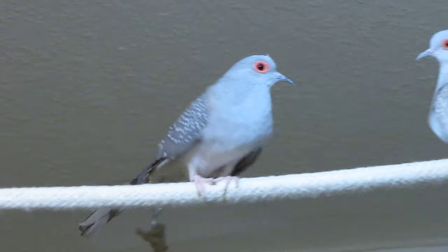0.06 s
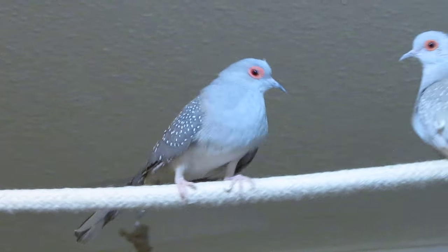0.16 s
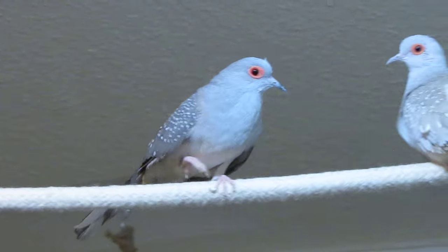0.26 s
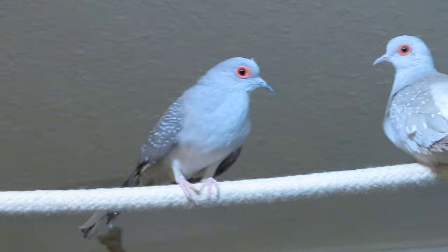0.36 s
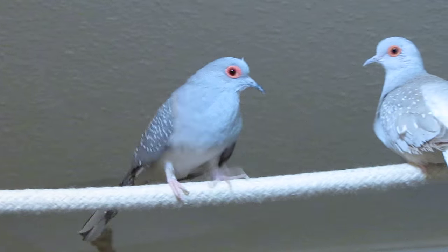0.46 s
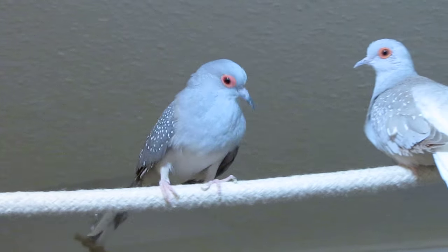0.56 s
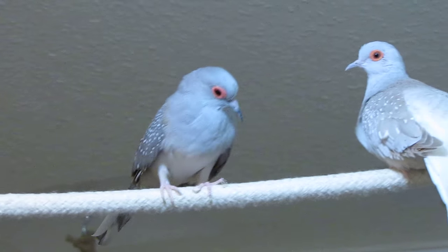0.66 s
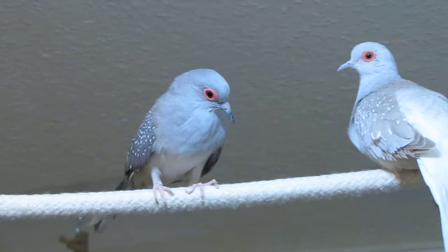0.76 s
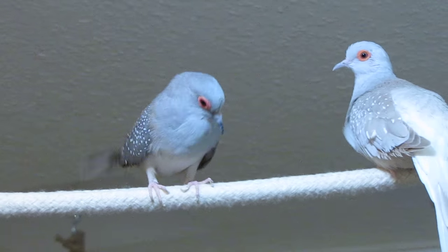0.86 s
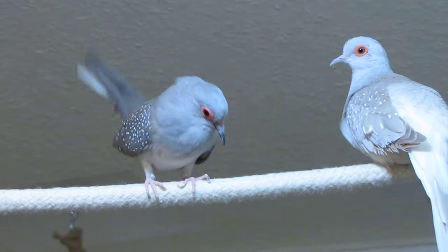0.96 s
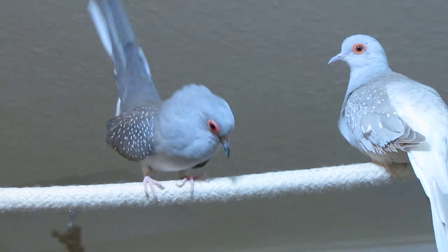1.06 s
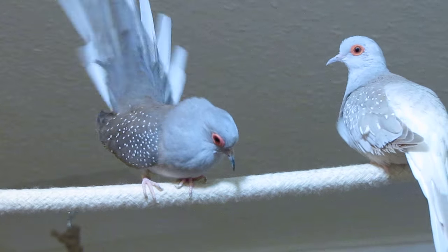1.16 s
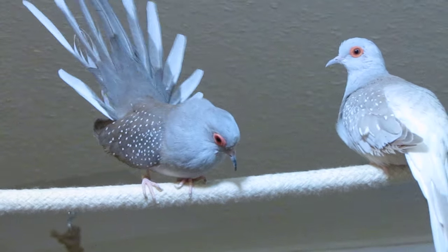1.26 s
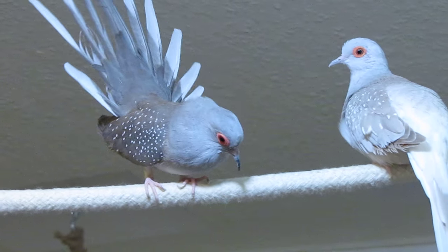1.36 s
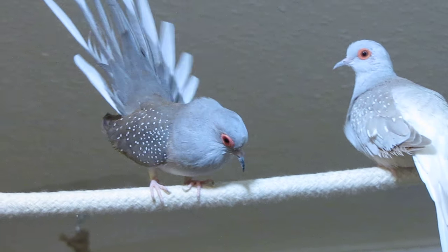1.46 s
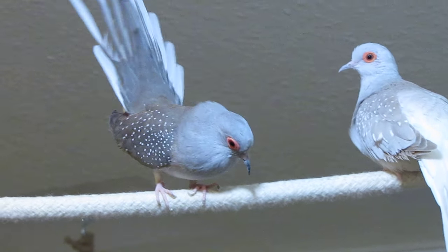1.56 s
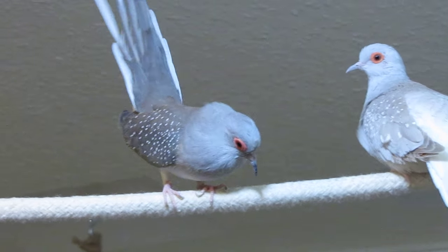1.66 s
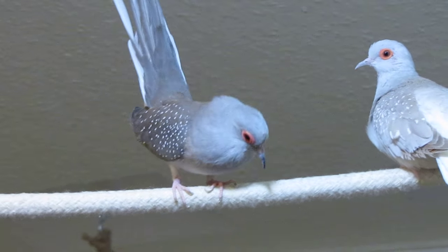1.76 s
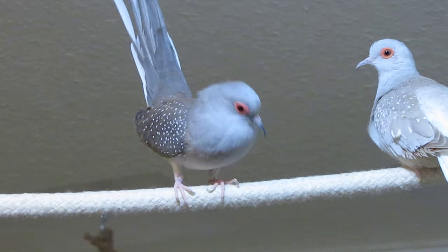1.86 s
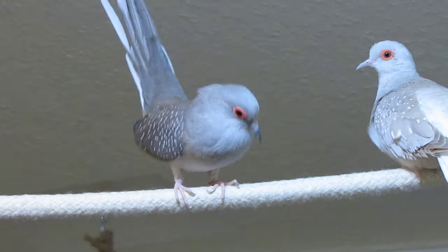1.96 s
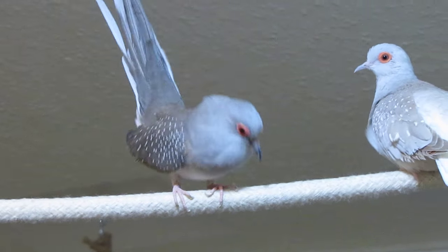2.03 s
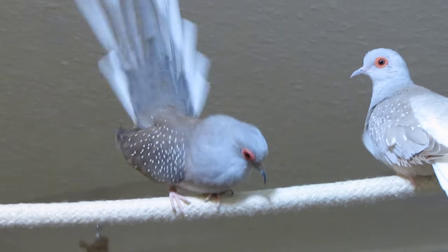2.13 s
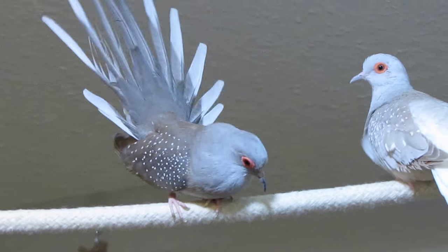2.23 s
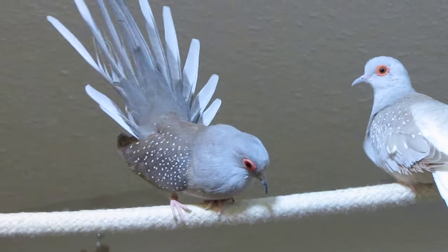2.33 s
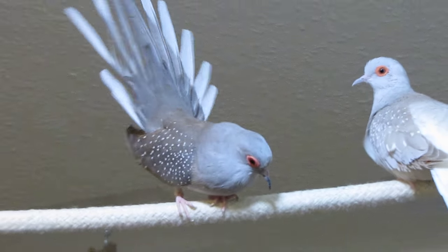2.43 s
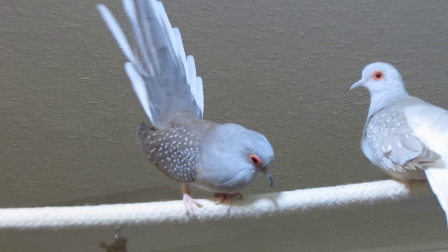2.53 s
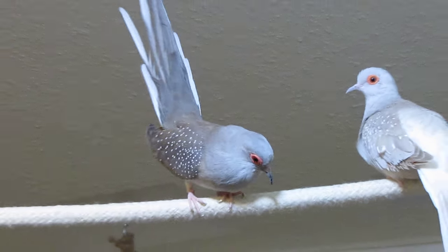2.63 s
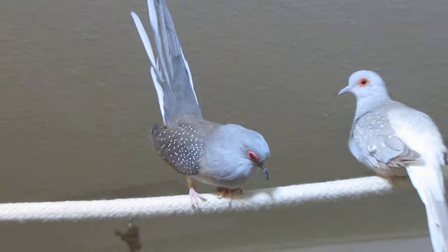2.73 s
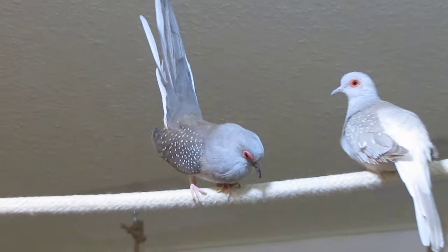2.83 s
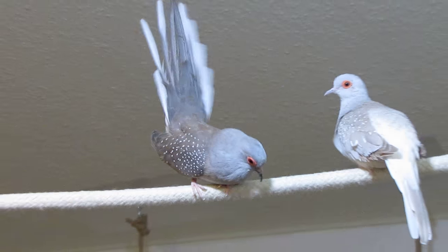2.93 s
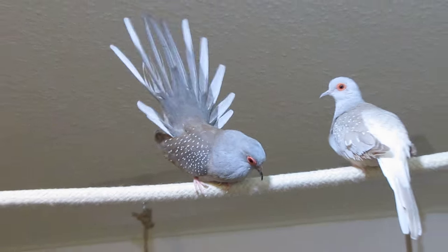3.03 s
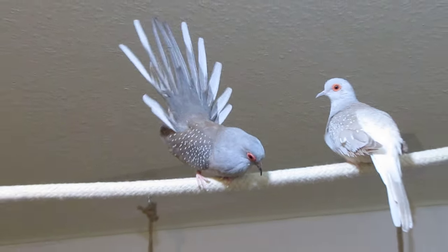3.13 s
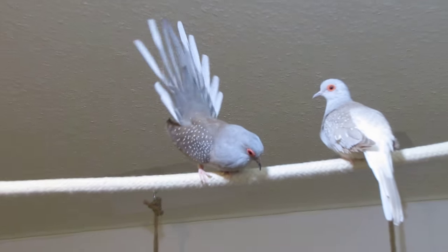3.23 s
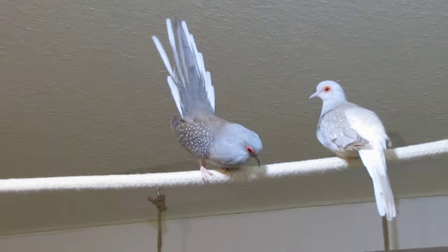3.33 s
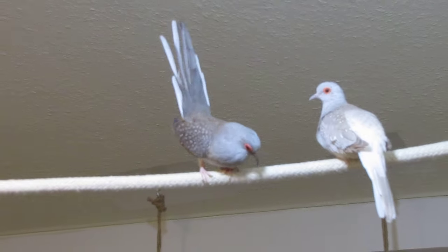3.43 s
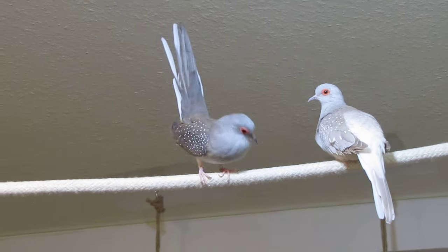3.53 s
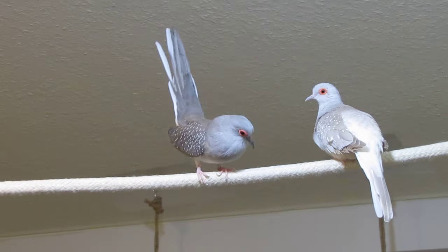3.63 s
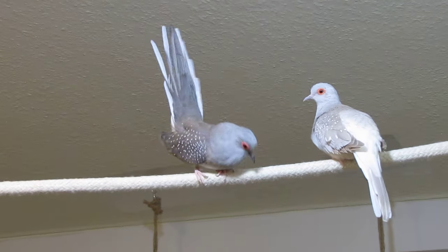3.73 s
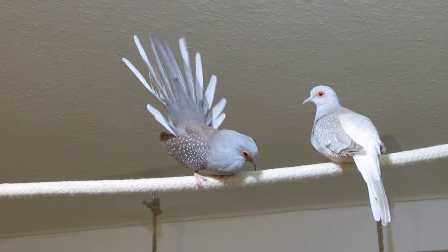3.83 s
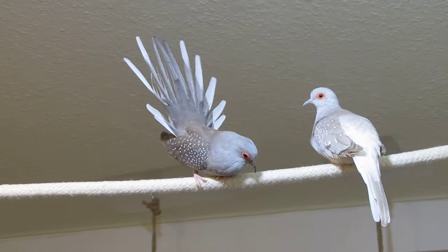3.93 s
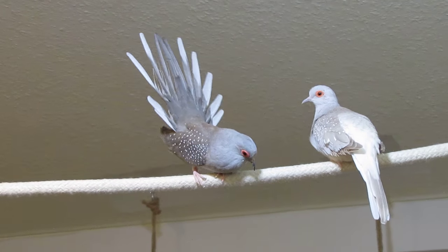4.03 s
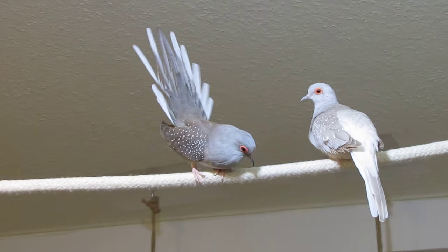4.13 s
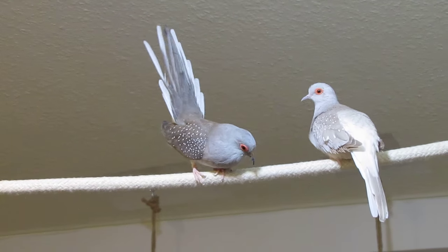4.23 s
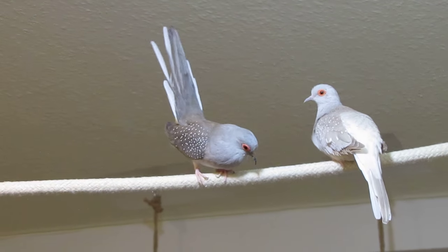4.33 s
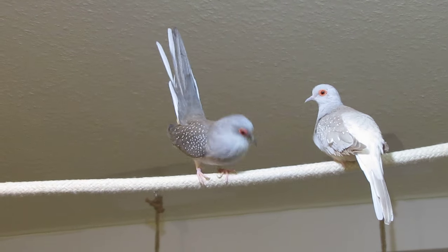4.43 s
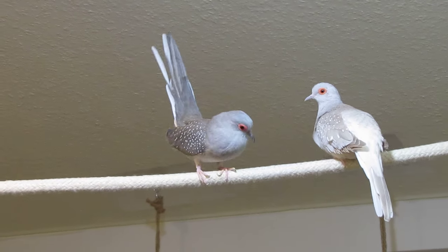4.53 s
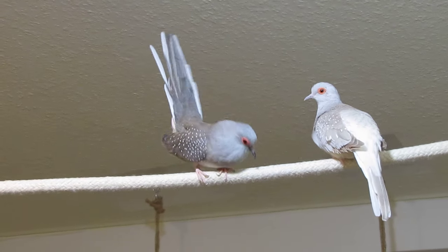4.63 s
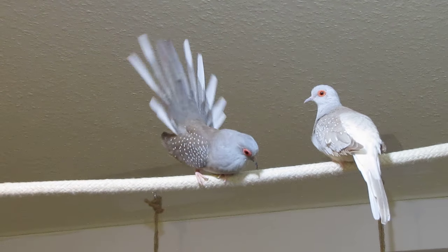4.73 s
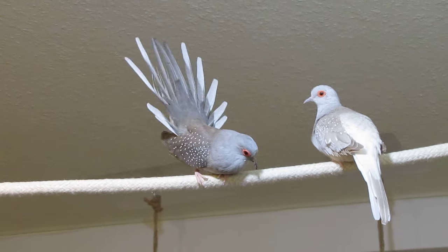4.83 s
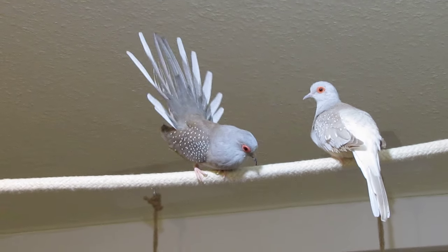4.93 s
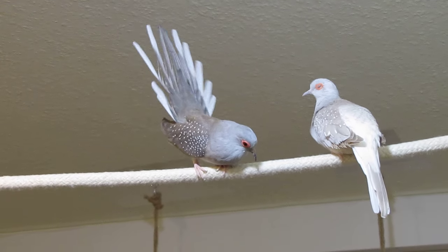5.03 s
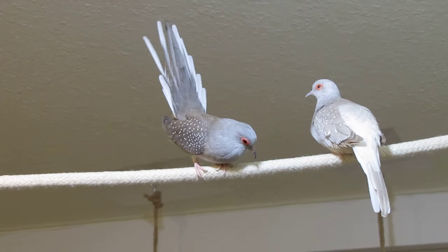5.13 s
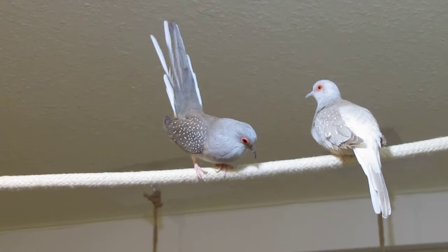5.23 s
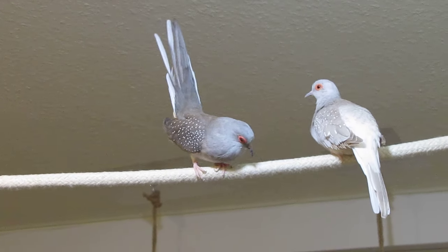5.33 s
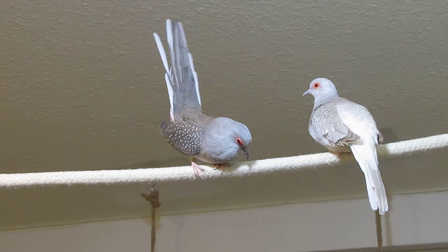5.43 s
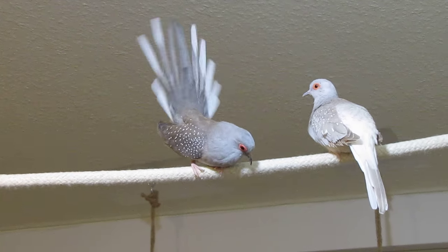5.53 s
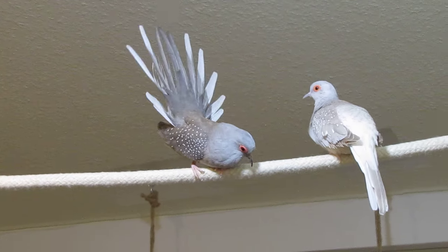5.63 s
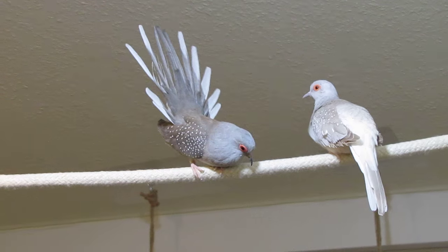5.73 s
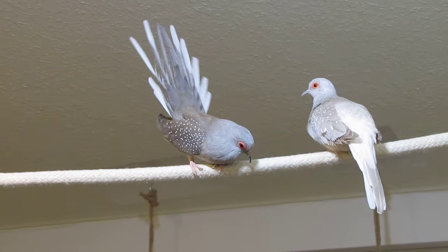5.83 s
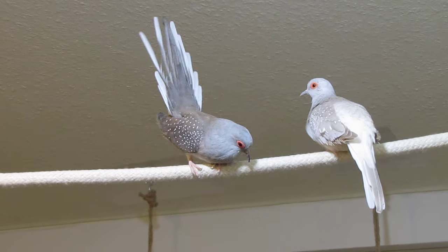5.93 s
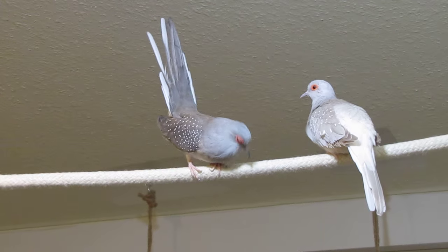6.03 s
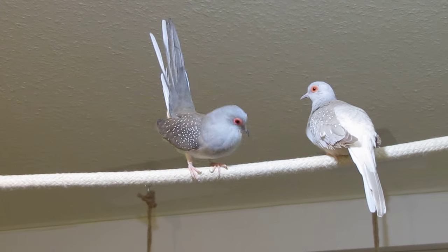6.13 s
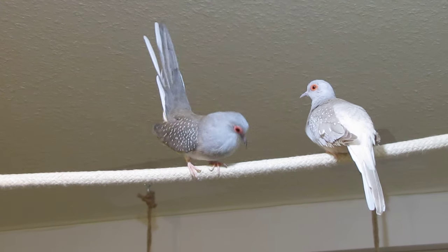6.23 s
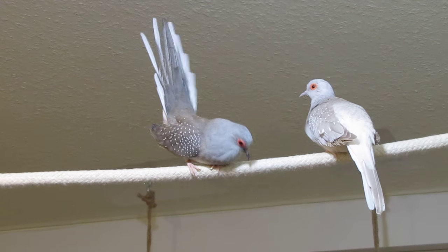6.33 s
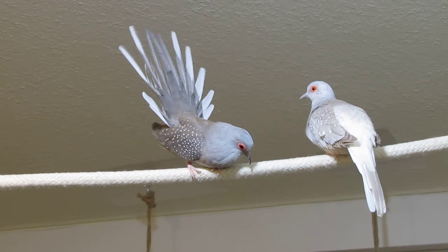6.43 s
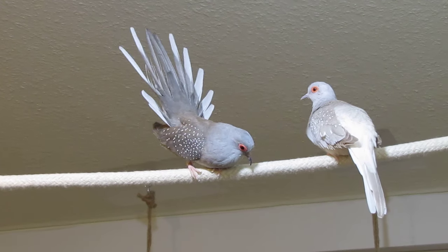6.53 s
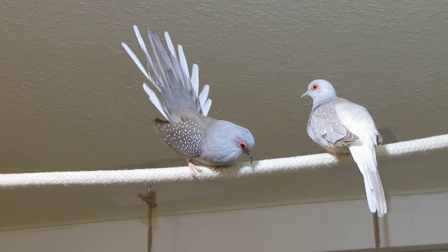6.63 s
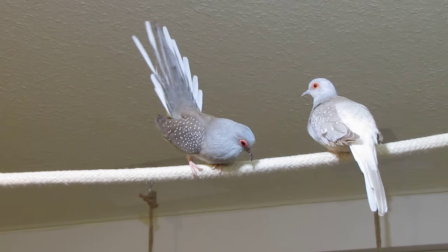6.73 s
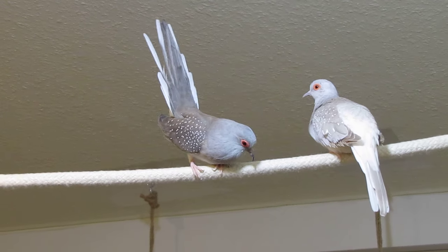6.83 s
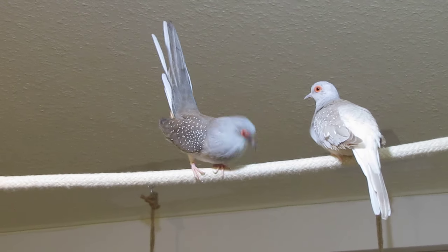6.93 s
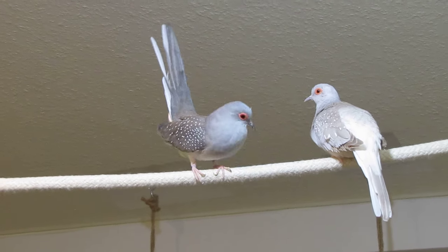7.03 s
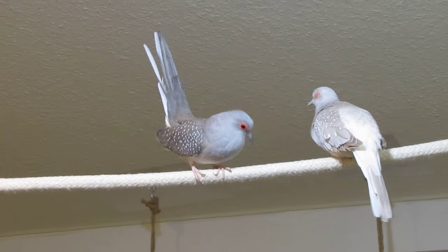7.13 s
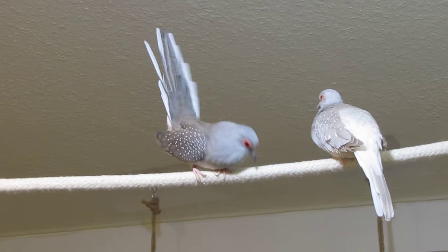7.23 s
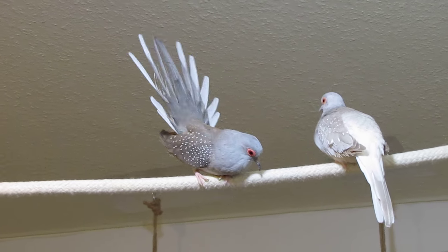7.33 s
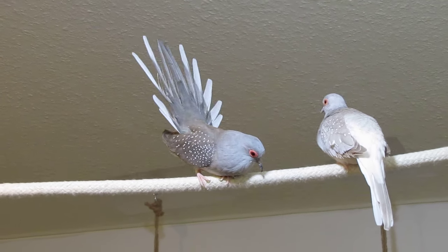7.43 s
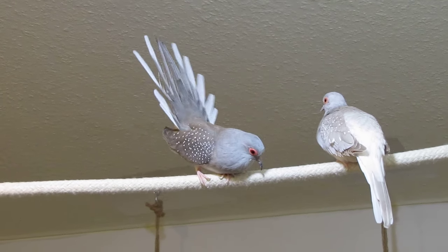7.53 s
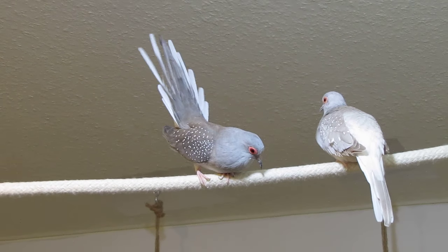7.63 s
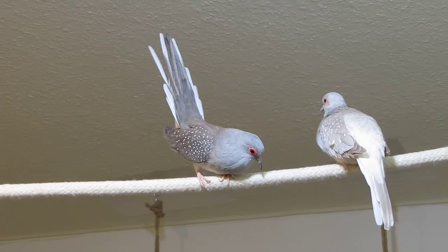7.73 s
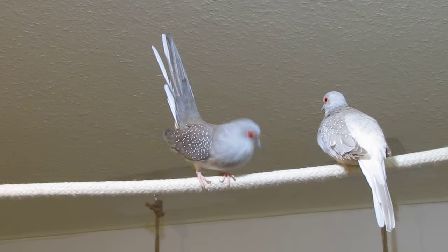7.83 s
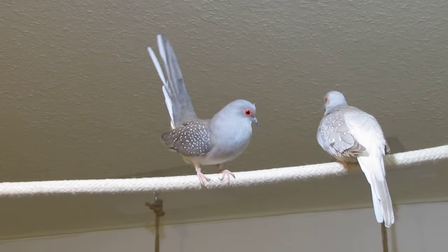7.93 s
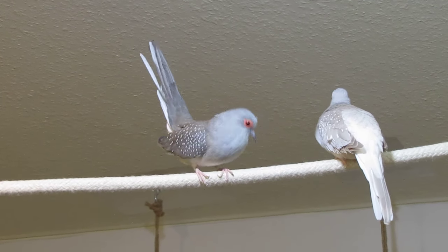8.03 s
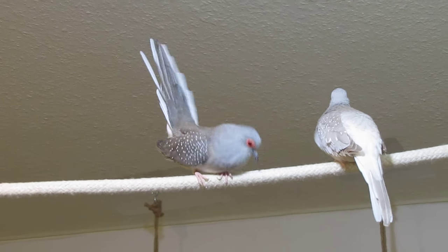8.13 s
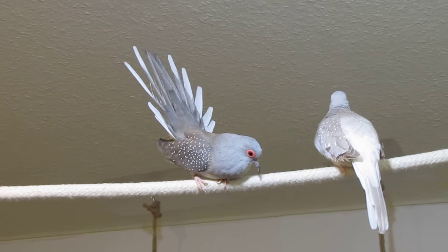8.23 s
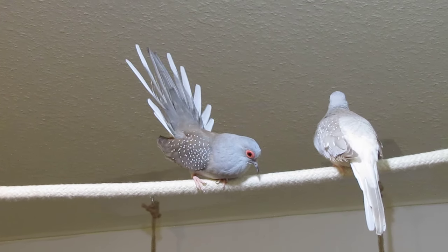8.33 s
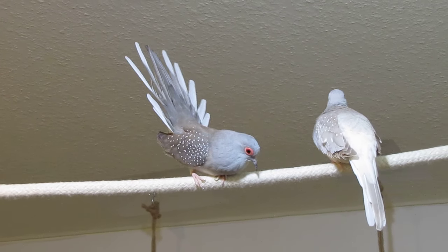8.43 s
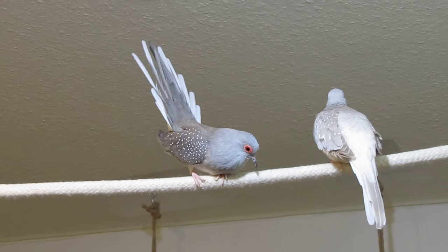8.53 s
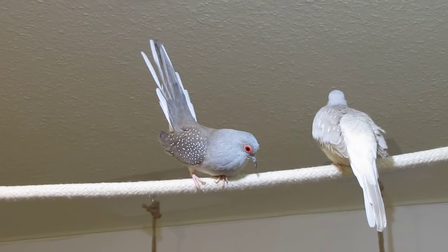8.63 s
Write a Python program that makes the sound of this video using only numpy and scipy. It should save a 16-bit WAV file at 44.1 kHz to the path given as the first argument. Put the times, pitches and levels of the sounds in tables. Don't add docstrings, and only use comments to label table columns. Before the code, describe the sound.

A courting dove on a rope perch coos nine times at regular intervals, its smooth low whistle-like tone slightly purring at the start and ringing off bare walls. Brief hissy rubs of fanning tail feathers fall between coos, with a few clicks close to the stereo microphone. Traffic murmurs faintly. In the second half another bird, a parakeet across the room, adds gliding whistles and sharp quick chirps, mostly as echoes.

```python
import sys
import numpy as np
from scipy import signal
from scipy.fft import rfft, irfft
from scipy.io import wavfile
from scipy.ndimage import uniform_filter1d

SR = 44100
rng = np.random.default_rng(int(sys.argv[2]) if len(sys.argv) > 2 else 0)


def generate_wav(sig):
    pcm = np.round(np.clip(np.atleast_2d(sig).T, -1, 1) * 32767).astype(np.int16)
    wavfile.write(sys.argv[1], SR, pcm)


def undo_db(level):
    steps = np.asarray(level, float) / 20
    return 10 ** steps


N = 382788
EDGE_HZ = 15700


def evened(x):
    return x / np.sqrt(np.mean(x ** 2) + 1e-20)


def read(points, hz):
    f, value = np.transpose(points)
    return np.interp(np.log(hz + 1), np.log(f + 1), value)


def add(mix, start_s, sound):
    part = mix[round(start_s * SR):][:len(sound)]
    part += sound[:len(part)]


def drift(length, hz):
    noise = rng.standard_normal(length + 4000)
    return evened(signal.lfilter(*signal.butter(2, hz, fs=SR), noise)[4000:])


def band_noise(shape, low_hz, high_hz, order=2):
    return signal.lfilter(*signal.butter(order, [low_hz, high_hz], "band", fs=SR), rng.standard_normal(shape))


def pair(shape, same):
    a, b, c, d = rng.standard_normal(shape[::-1] + (4,)).T
    same = np.clip(same, -1, 1)[:, None]
    left, other = a + 1j * b, c + 1j * d
    return np.array([left, same * left + np.sqrt(1 - same ** 2) * other])


def air():
    # f/Hz, level/dB per Hz
    air_spectrum = [(25, -12.5), (55, -1), (90, -18), (140, -11.5), (320, -17.5), (600, -19), (1000, -11.5),
                    (2000, -27), (4500, -28.5), (15600, -36)]
    # f/Hz, likeness [-1..1]
    air_same = [(60, 0.95), (180, 0.39), (550, 0.36), (1650, 0.034), (4970, 0.11), (15000, 0.075)]
    # f/Hz, level/dB
    air_lean = [(60, 1), (180, -2), (550, -2), (1650, 0), (4970, 1.5), (15000, -2)]
    frames, hz = N // 256 + 5, np.fft.rfftfreq(1024, 1 / SR)
    patches = rng.standard_normal((frames, 513)).T
    patches_db = evened(uniform_filter1d(uniform_filter1d(patches, 10, 0), 20, 1))
    z = pair((513, frames), read(air_same, hz)) * undo_db(read(air_spectrum, hz)[:, None] + patches_db)
    z = z * undo_db(np.multiply.outer([.5, -.5], read(air_lean, hz)))[:, :, None]
    return undo_db(-50.5) * evened(signal.istft(z, nperseg=1024, noverlap=768)[1][:, :N])


def engine():
    # t/s, f/Hz, level/dB
    engine_course = [(0.0, 70.36, -62), (0.22, 73.04, -59), (0.5, 58.5, -76), (0.74, 45.56, -60),
                     (1.01, 65.55, -47.5), (1.33, 71.9, -51.5), (1.57, 61.17, -52), (2.03, 60.5, -49.5),
                     (2.39, 74.76, -47), (2.9, 77.53, -64.5), (3.2, 78.96, -53.5), (3.58, 58.8, -53),
                     (3.8, 55.35, -56), (4.33, 56.4, -47), (4.6, 60, -63.5), (7.5, 59.7, -58),
                     (8.25, 66.75, -43), (8.68, 66.7, -48.5)]
    t = np.arange(N) / SR
    s, hz, db = np.transpose(engine_course)
    turn = 2 * np.pi * np.cumsum(np.interp(t, s, hz) + 3.0 * drift(N, 2.1)) / SR
    level = undo_db(np.interp(t, s, db) + 1.8 * drift(N, 3.8))
    port_phase = np.array([[0], [.3]])
    return np.sqrt(2) * level * (np.sin(turn + port_phase) + undo_db(-19.5) * np.sin(2 * turn))


def tyre_band(level_db, low_hz, high_hz, unlike):
    noise = band_noise((3, N), low_hz, high_hz)
    return undo_db(level_db) * evened(noise[0] + unlike * noise[1:])


def tyres():
    t = np.arange(N) / SR
    gust_db = 10 * np.exp(-((t - 4.23) / 0.12) ** 2)
    wash_db = -49 - 2.5 * abs(t - 2.4) + gust_db
    roar_db = -57 - 2.5 * abs(t - 0.89)
    wash = undo_db(-4.5) * tyre_band(wash_db, 46, 350, 0.79)
    roar = tyre_band(roar_db, 720, 1420, .8) * undo_db(np.array([[-1.5], [1.5]]))
    return wash + roar


def feathers():
    # middle t/s, length/s, level/dB, dullness/dB per octave
    swishes = [(0.399, 0.11, -66, -5), (1.204, 0.19, -57.5, 0.5), (1.588, 0.083, -52.5, 1.4),
               (2.171, 0.19, -54, 2.5), (2.989, 0.11, -58.5, -2), (3.823, 0.11, -51.5, 4.5),
               (4.218, .27, -51.5, -2), (4.628, 0.058, -50, 0), (4.739, 0.15, -56, -0.5),
               (2.806, 1.0, -65, -2.5), (5.122, 0.097, -37.5, -8), (5.403, 0.39, -49, -10),
               (6.398, 0.11, -57.5, 1), (7.302, 0.092, -58.5, -3.5), (8.206, .12, -58, -0.4)]
    # f/Hz, level/dB per Hz
    vane_spectrum = [(710, -33.5), (1200, -1), (1250, -27.5), (1420, -9), (2460, -7), (3180, -8),
                     (15500, -7)]
    out, hz = np.zeros(N), np.fft.rfftfreq(SR, 1 / SR)
    bass_cut = (hz ** 2 / (hz ** 2 + 1000 ** 2)) ** 2
    for middle_s, length_s, db, dull_db in swishes:
        n = round(length_s * SR)
        grains = rng.standard_normal(SR) * undo_db(2.5 * drift(SR, 250))
        colour = undo_db(read(vane_spectrum, hz) + dull_db * np.log2(hz / 3000 + 0.022)) * bass_cut
        rub = irfft(rfft(grains) * colour)[:n]
        add(out, middle_s - length_s / 2, undo_db(db) * evened(rub) * signal.windows.tukey(n, .7))
    return out


def ticks():
    # t/s, peak level/dB, ring f/Hz, thud level/dB, bright share [0..1]
    tick_events = [
        (0.37, -46.5, 2400, -38, .02),
        (1.552, -38.5, 1710, -31, 0.075),
        (1.936, -48, 1500, -27.5, 0.099),
        (2.297, -27.5, 3625, -28, 0.11),
        (2.326, -38.5, 3590, -40, 0.056),
        (2.375, -29.5, 3706, -27, 0.09),
        (3.166, -39, 2500, -42.5, 0.032),
        (3.326, -28, 3436, -30, 0.048),
        (3.479, -18, 1407, -38, 0.072),
        (7.638, -52, 8230, -64, 0.095),
    ]
    out, t = np.zeros(N), np.arange(2000) / SR
    for s, db, hz, thud_db, bright in tick_events:
        decay = undo_db(-60 * t * hz / 45)
        grit = rng.standard_normal(len(t)) * decay * np.minimum(t / 0.0072, 1)
        ring = signal.lfilter(*signal.butter(1, [hz * .65, hz * 1.5], "band", fs=SR), grit)
        crack = ring + bright * np.diff(grit, prepend=0)
        thud = band_noise(len(t), 200, 1300) * undo_db(-60 * t / 0.075)
        add(out, s, undo_db(db) * crack / abs(crack).max() + undo_db(thud_db) * thud / abs(thud).max())
    return out


def voice(rows, waver, waver_hz, smooth_s, steady_hz):
    s, hz, db = np.transpose(rows)
    t = np.arange(s[0], s[-1], 1 / SR)
    smooth = max(round(smooth_s * SR), 1)
    hz = uniform_filter1d(np.interp(t, s, hz), smooth, mode="nearest")
    db = uniform_filter1d(np.interp(t, s, db), smooth, mode="nearest")
    slack = np.clip(10 * (1 - hz / steady_hz), 0, 1)
    wavering = 1 + waver * (1 + 2 * slack) * drift(SR, waver_hz)[:len(t)]
    turn = 2 * np.pi * np.cumsum(hz * wavering) / SR
    return turn, hz, np.sqrt(2) * undo_db(db) * signal.windows.tukey(len(t), .05), slack


def parakeet(calls, beak, waver, steady_hz, rasp, strain):
    out = np.zeros(N)
    for rows in calls:
        turn, hz, level, _ = voice(rows, waver, 280, 0.0017, steady_hz)
        strain_db = strain * (rows[-2][2] + 32.5)
        tone = 0
        for k in range(1, 9):
            partial_db = read(beak, k * hz) - read(beak, hz) + (k > 1) * strain_db
            tone = tone + undo_db(partial_db) * (k * hz < EDGE_HZ) * np.sin(k * turn)
        onset = 1 + 1.7 * np.exp(-np.arange(len(hz)) / SR / 0.012)
        rough = rasp * onset * drift(SR, 670)[:len(hz)]
        add(out, rows[0][0], level * tone * (1 + rough))
    return signal.lfilter(*signal.butter(4, 0.9 * steady_hz, "high", fs=SR), out)


def warble_shape(start_s, length_s, from_hz, to_hz, db):
    end_s, edge_db = start_s + length_s, db - 20.5
    return [(start_s, from_hz, edge_db), (start_s + .011, from_hz, db),
            (end_s, to_hz, db - 3), (end_s + 0.0043, to_hz, edge_db)]


def warbles():
    # t/s, length/s, from f/Hz, to f/Hz, effort level/dB
    glides = [(1.138, 0.12, 1288, 1430, -51), (3.69, 0.16, 1167, 1116, -68), (4.564, 0.16, 981, 981, -44.5),
              (5.095, .09, 1060, 1194, -47), (5.563, 0.051, 976, 1008, -37),
              (4.403, 0.049, 1651, 1625, -35), (4.449, 0.035, 1473, 1305, -39.5),
              (4.524, .035, 1321, 2330, -40), (4.549, 0.034, 1391, 1346, -46.5),
              (4.578, 0.014, 2016, 1920, -43.5), (4.609, 0.017, 1405, 1310, -45),
              (4.673, 0.022, 1260, 1967, -32), (4.697, .04, 1950, 2300, -44),
              (4.839, .045, 1320, 1463, -35), (5.089, 0.034, 2494, 2203, -29),
              (5.2, 0.09, 1320, 2114, -29.5), (5.249, 0.14, 1496, 1713, -36.5),
              (5.301, .14, 2088, 2315, -32), (5.431, 0.053, 2110, 1573, -37),
              (5.495, 0.063, 1430, 1595, -36.5), (5.59, .17, 2054, 1780, -50.5),
              (5.857, .1, 1770, 1804, -56)]
    # f/Hz, level/dB
    beak = [(1000, 1), (1600, -4.5), (3200, -9.5), (5000, -26), (7000, -24.5), (10000, -41), (14500, -48)]
    return parakeet([warble_shape(*row) for row in glides], beak, .038, 1300, .27, 0)


def coo_shape(start_s, slack_s, climb_s, long_s, short_s, slack_hz, short_hz, long_db, short_db):
    scoop_s, swell_s, droop_s = .021, .14, 0.045
    top_hz, sag_hz_per_s, short_sag_hz = 861, 95, 11
    top_s = scoop_s + slack_s + 0.0032 + climb_s
    tired_s = long_s - droop_s
    held_hz = slack_hz + 200 * slack_s
    peak_hz = top_hz + 30 * max(1 - climb_s / .07, 0)
    tired_hz = top_hz - sag_hz_per_s * (tired_s - top_s)
    slack_db, end_s = long_db - 5.5, long_s + short_s
    rows = [(0, 624.6, long_db - 8),
            (scoop_s, slack_hz, slack_db),
            (top_s - climb_s, held_hz, slack_db),
            (top_s - .6 * climb_s, held_hz + .7 * (peak_hz - held_hz), slack_db),
            (top_s, peak_hz, long_db - 7.5),
            (top_s + swell_s, top_hz - sag_hz_per_s * swell_s, long_db),
            (tired_s, tired_hz, long_db - 5),
            (long_s, tired_hz - 21.3, short_db - 12),
            (long_s + .024, short_hz, short_db),
            (end_s, short_hz - short_sag_hz, short_db - 10),
            (end_s + 0.037, short_hz - 2 * short_sag_hz, short_db - 28)]
    return np.array(rows) + [start_s, 0, 0]


def dove():
    # t/s, slack/s, climb/s, long note/s, short note/s
    coo_times = [
        (1.183, .2, .06, 0.63, 0.18),
        (2.191, .0, 0.028, 0.46, 0.094),
        (3.017, .0, 0.032, 0.38, 0.15),
        (3.855, 0.0059, .08, 0.47, 0.11),
        (4.769, 0.037, 0.076, 0.46, 0.077),
        (5.596, 0.011, 0.051, 0.41, .12),
        (6.442, .02, 0.082, .498, 0.088),
        (7.346, 0.041, 0.078, 0.46, 0.099),
        (8.238, 0.0084, 0.11, 0.37, 0.046),
    ]
    # slack f/Hz, short note f/Hz, long note level/dB, short note level/dB, purr depth [0..1]
    coo_efforts = [
        (739, 785, -13.5, -19.5, 0.43),
        (805, 765, -14, -16.5, 0.6),
        (823, 785, -12.5, -13, 0.22),
        (779, 785, -13, -16, 0.4),
        (798, 782, -15, -19, .08),
        (812, 785, -13.5, -13.5, 0.2),
        (775, 792, -13, -17.5, 0.27),
        (800, 790, -13, -15.5, .2),
        (755, 890, -13.5, -21.5, .25),
    ]
    # multiple of the pitch, level/dB
    overtones = [(1, 5), (2, -42.5), (3, -47), (4, -45), (5, -55.5)]
    out, t = np.zeros(N), np.arange(3000) / SR
    for timing, (*effort, purr) in zip(coo_times, coo_efforts):
        rows = coo_shape(*timing, *effort)
        turn, hz, level, slack = voice(rows, 0.0027, 78, 0.00094, 845)
        n = len(hz)
        throb = np.sin(2 * np.pi * np.cumsum(64 + 13.0 * drift(SR, 9.7)[:n]) / SR)
        swelling = 1 + np.exp(-np.arange(n) / SR / 0.087)
        leak = swelling * undo_db(5.0 * drift(SR, 35)[:n]) * (1 - 0.099 * slack)
        upper = sum(undo_db(db) * np.sin(k * turn) for k, db in overtones[1:])
        tone = level * np.sin(turn) + np.minimum(level, .09) * leak * upper
        add(out, rows[0][0], tone * (1 + purr * slack * throb))
        puff = evened(band_noise(len(t), 520, 1050))
        add(out, rows[0][0] - .022, undo_db(-36.5 - 60 * t / .1) * puff * np.minimum(t / .002, 1))
    return signal.lfilter(*signal.butter(2, 660, "high", fs=SR), out)


def standing(x):
    # f/Hz, level/dB, t60/s
    modes = [(700, -11.5, .8), (778, -9.5, 0.97), (797, -12, 0.97), (871, -13, 1)]
    t = np.arange(SR) / SR
    ring = sum(undo_db(db - 60 * t / t60) * np.cos(2 * np.pi * hz * t) / t60 for hz, db, t60 in modes)
    return signal.fftconvolve(x, ring * 2 * np.log(1000) / SR)[:N]


def mains_hum():
    # t/s, length/s, level/dB
    hum_spells = [
        (4.44, 0.38, -45),
        (4.95, 0.4, -55.5),
        (5.42, 1.52, -46.5),
        (6.95, 0.73, -47),
    ]
    t, level = np.arange(N) / SR, 0
    for s, length_s, db in hum_spells:
        inside_s = np.minimum(t - s, s + length_s - t)
        level = level + undo_db(db) * np.clip(inside_s / 0.037, 0, 1)
    return np.sqrt(2) * level * np.sin(2 * np.pi * 59.9 * t)


def chirp_shape(start_s, open_s, middle_hz, last_hz, db):
    step_s, open_hz, high_hz = .005, 1780, 3428
    last_s = 0.067 + .006 * (db + 28)
    # length/s, from f/Hz, to f/Hz, level/dB, change/dB
    notes = [(open_s, open_hz, open_hz + 363, db - 6, -2),
             (.026, high_hz + 197, high_hz, db - 4, 2),
             (.032, middle_hz, middle_hz - 60, -20, 0),
             (last_s, last_hz, last_hz - 29.8, db, -6)]
    rows, s = [(start_s, open_hz - 100, db - 25.5)], start_s
    for length_s, from_hz, to_hz, note_db, fade_db in notes:
        rows.append((s + step_s, from_hz, note_db))
        s += max(length_s, 2 * step_s)
        rows.append((s, to_hz, note_db + fade_db))
    return rows + [(s + 0.013, last_hz - 150, db - 26.5)]


def chirps():
    # t/s, opening note/s, middle note f/Hz, last note f/Hz, effort level/dB
    contact_calls = [
        (4.808, .024, 2695, 3423, -21.5),
        (5.118, .028, 2643, 3207, -27.5),
        (6.965, 0.025, 2710, 3270, -29.5),
        (8.415, 0.021, 2548, 3409, -21.5),
        (8.662, 0.033, 2600, 3400, -22),
    ]
    # f/Hz, level/dB
    beak = [(1300, -2.5), (2600, 5.5), (3600, -2.5), (5200, -22), (7000, -15.5), (10300, -28),
            (14500, -50.5)]
    return parakeet([chirp_shape(*row) for row in contact_calls], beak, .012, 2400, .18, .8)


def room(x, onset_s):
    # f/Hz, t60/s
    decay_times = [(300, 0.067), (800, 0.64), (2000, 0.55), (4000, 0.36), (8000, 0.18), (14000, 0.024)]
    # f/Hz, likeness [-1..1]
    wall_same = [(300, 1), (800, 0.88), (1600, 0.69), (3000, -0.071), (7000, -0.41), (14000, 0.94)]
    hz, t = np.fft.rfftfreq(256, 1 / SR), np.arange(700) * 64 / SR
    t60_s = np.maximum(read(decay_times, hz), .05)[:, None]
    z = pair((129, 700), read(wall_same, hz)) * undo_db(-60 * t / t60_s)
    tail = signal.istft(z, nperseg=256, noverlap=192)[1]
    tail = tail * np.clip(np.arange(tail.shape[1]) / SR / onset_s - .5, 0, 1)
    return signal.fftconvolve(x[None], tail / np.linalg.norm(tail[0]), axes=1)[:, :N]


def placed(x, lean_db, lag):
    return np.array([x * undo_db(lean_db / 2), np.roll(x, lag) * undo_db(-lean_db / 2)])


def scene():
    background = air() + engine() + tyres() + mains_hum()
    swish, tick, warble, coos, chirp = feathers(), ticks(), warbles(), dove(), chirps()
    direct = placed(coos + standing(coos) + swish, -1.3, lag=-1)
    direct = direct + placed(undo_db(-4) * chirp + undo_db(-10.5) * warble, 1.1, lag=4) + placed(tick, .4, lag=0)
    near = room(undo_db(-5.5) * coos + undo_db(7.0) * swish + undo_db(-18.0) * tick, 0.012)
    far = room(undo_db(3.0) * chirp + undo_db(3.12) * warble, 0.003)
    return background + direct + near * undo_db(np.array([[-.8], [.8]])) + far


def low_pass(x):
    return signal.sosfilt(signal.butter(12, 15750, fs=SR, output="sos"), x)


def record(dry):
    hz = [0, 8000, 14000, EDGE_HZ - 150, EDGE_HZ + 150, SR / 2]
    colour = signal.firwin2(511, hz, [1, 0.74, 0.52, .45, 0.11, 0.021], window=("kaiser", 9), fs=SR)
    ending = np.minimum(np.arange(N)[::-1] / SR / .004, 1)
    mix = signal.oaconvolve(dry * ending, colour[None], "same")
    return low_pass(mix)


dry = scene()
out = record(dry)
generate_wav(out)
```